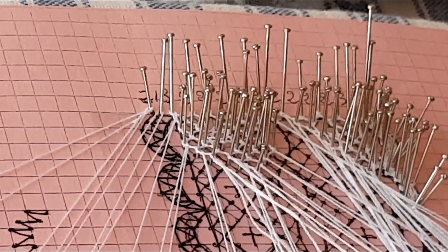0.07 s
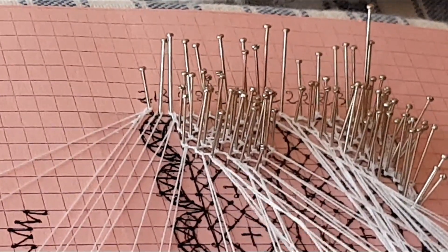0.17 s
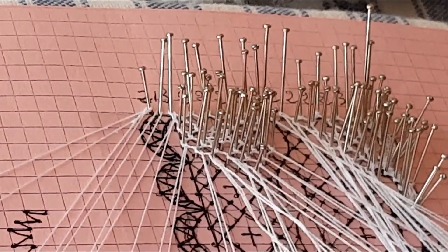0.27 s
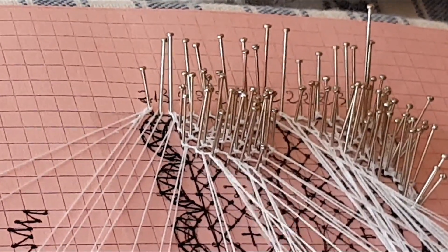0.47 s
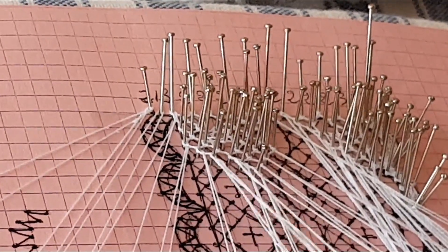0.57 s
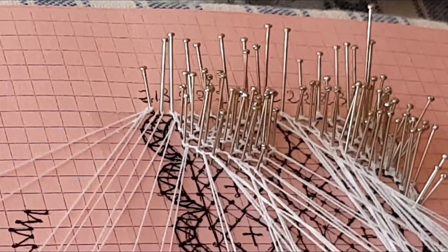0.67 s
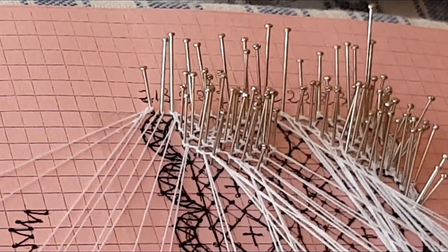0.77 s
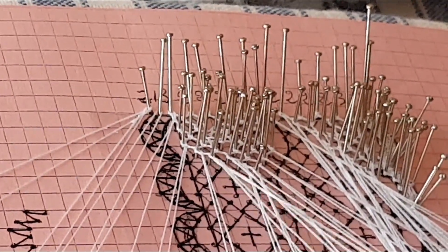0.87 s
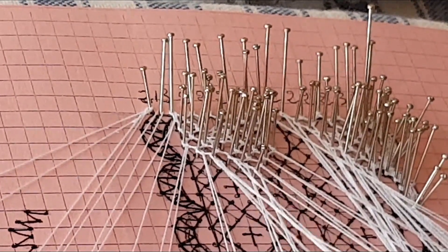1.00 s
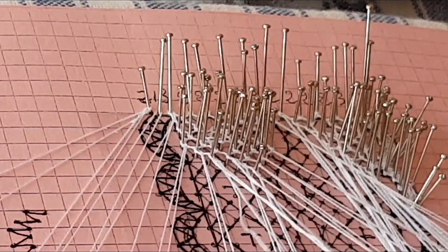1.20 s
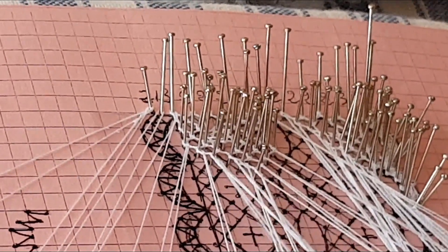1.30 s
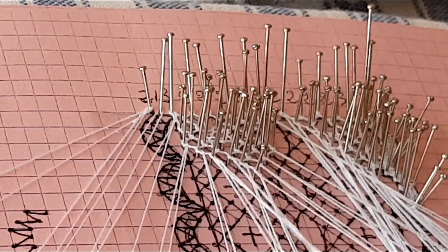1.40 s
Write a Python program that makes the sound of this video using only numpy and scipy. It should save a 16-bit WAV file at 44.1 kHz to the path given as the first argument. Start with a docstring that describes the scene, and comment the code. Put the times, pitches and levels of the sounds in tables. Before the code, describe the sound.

Bright, dry clicks of wooden bobbins being shuffled on a lace pillow, close to the microphone. A hand brushes softly midway, then a thread rubs and squeaks briefly among the last clicks, over a quiet room's faint hum.

```python
"""Lace bobbins on a pillow

Wooden bobbins are shuffled close by in a small quiet room, over a low hum and faint room noise.
Each knock is a dry contact tick plus three bending modes of both sticks; other ticks are noise bands.
A hand brushes the pillow; near the end a thread is drawn tight, rubbing and squeaking."""
import sys
import numpy as np
from scipy import signal
from scipy.fft import rfft, irfft
from scipy.io import wavfile
from scipy.ndimage import uniform_filter1d

SR = 44100
rng = np.random.default_rng(int(sys.argv[2]) if len(sys.argv) > 2 else 0)


def master_out(mix):
    """Clip the mix to full scale and print it as 16-bit PCM to the path in sys.argv[1]."""
    frames = np.transpose(np.atleast_2d(mix))
    ceiling = np.clip(frames, -1, 1)
    pcm = np.round(ceiling * 32767).astype(np.int16)
    wavfile.write(sys.argv[1], SR, pcm)


N = 63945
TIME = np.arange(N) / SR
TOUCH_TIME = TIME[:N // 12]
CONTACT_RISE_S = 0.00041

# bobbins sliding on the pillow: (time [s], level [dB])
SLIDE_LEVEL = [(.1, -77.5), (.31, -58), (.385, -47), (.59, -71), (.68, -58.5), (.77, -60), (.98, -67.5),
               (1.06, -50.5), (1.16, -69.5)]


def from_db(db):
    """Decibels to gain."""
    return 10 ** (np.asarray(db) / 20)


def level(rows):
    """Gain over time from (time [s], level [dB]) points."""
    return from_db(np.interp(TIME, *np.transpose(rows)))


def envelope(t, t60_s, rise_s=CONTACT_RISE_S):
    """Smooth onset, exponential decay."""
    return (1 - np.exp(-(t / rise_s) ** 2)) * from_db(-60 * t / t60_s)


def panned(db):
    """Stereo gains for a left-right level difference."""
    gains = from_db(np.array([[db], [-db]]) / 2)
    return gains / np.sqrt(np.mean(gains ** 2))


def noise(colour, correlation):
    """Coloured stereo noise, rms 1."""
    hz, db = np.transpose(colour)
    bin_hz = np.arange(N + 1) * SR / (2 * N)
    gain = from_db(np.interp(np.log(bin_hz + 1), np.log(hz), db))
    mid, side = irfft(rfft(rng.standard_normal((2, 2 * N))) * gain)[:, :N]
    x = np.sqrt(1 + correlation) * mid + np.sqrt(1 - correlation) * np.array([side, -side])
    return x / x.std()


def burst(source, t60_s):
    """A random stretch of noise, struck and dying away."""
    start = rng.integers(N - len(TOUCH_TIME))
    return source[:, start:start + len(TOUCH_TIME)] * envelope(TOUCH_TIME, t60_s)


def add(out, at_s, sound):
    """Mix a sound in at a given time."""
    i = int(np.clip(at_s * SR, 0, N - 1))
    out[:, i:i + sound.shape[1]] += sound[:, :N - i]


def background(hum_hz=61.5, air_db=-66.5):
    """Low swelling hum and steady room noise."""
    # hum: (time [s], level [dB])
    hum_level = [(0, -70.5), (.2, -58.5), (.42, -70.5), (.82, -65), (.95, -76.5)]
    # room noise: (frequency [Hz], relative density [dB])
    air_colour = [(20, -18.5), (70, 5.5), (170, -4), (400, -14.5), (1000, 3), (1500, -10.5), (4800, -46.5),
                  (7000, -24), (15000, -14)]
    hum = np.sqrt(2) * level(hum_level) * np.sin(2 * np.pi * hum_hz * TIME)
    return hum * panned(db=1.5) + from_db(air_db) * noise(air_colour, correlation=0.14)


def room(x, gain_db=-4.5):
    """Dense, short-lived reflections, different at each side."""
    t = TIME[:N // 2]
    tail = rng.standard_normal((2, len(t))) * envelope(t, t60_s=0.18, rise_s=0.0022)
    tail /= np.sqrt(np.sum(tail ** 2) / 2)
    return from_db(gain_db) * signal.fftconvolve(x.mean(axis=0)[None], tail, axes=1)[:, :N]


def hand():
    """A hand brushes the pillow: soft, low noise."""
    # brushing: (time [s], level [dB])
    brush_level = [(.62, -93.5), (.68, -61), (.79, -65.5), (.95, -74.5)]
    # brushing: (frequency [Hz], relative density [dB])
    brush_colour = [(150, -6.5), (700, -13), (2000, -16.5)]
    return level(brush_level) * noise(brush_colour, correlation=0.5)


def sliding(rough_db=4.0):
    """Grainy rustle of bobbins moving over the pillow."""
    # rustle: (frequency [Hz], relative density [dB])
    slide_colour = [(500, -19), (1600, 1), (2300, -6), (4900, 1), (6700, -17.5), (8800, 0), (10500, -10),
                    (16000, -16.5)]
    grain = uniform_filter1d(rng.standard_normal(N), size=100)
    grain = from_db(rough_db * grain / grain.std())
    grain /= np.sqrt(np.mean(grain ** 2))
    return level(SLIDE_LEVEL) * noise(slide_colour, correlation=0.15) * grain


def mode(hz, t60_s, lead_rad):
    """One decaying bending mode; the left side leads by about lead_rad."""
    phase = rng.uniform(0, 2 * np.pi) + np.array([[1], [-1]]) * (lead_rad + .5 * rng.standard_normal()) / 2
    return np.sin(2 * np.pi * hz * TOUCH_TIME + phase) * envelope(TOUCH_TIME, t60_s)


def stick(hz, first_db, second_db, third_db):
    """Three bending modes of a bobbin, the second at hz."""
    third_hz = 8985 * (hz / 5128) ** 0.68   # rises more slowly than the second
    return (from_db(first_db - 0.5) * mode(0.351 * hz, t60_s=0.11, lead_rad=1.46)
            + from_db(second_db + 0.5) * mode(hz, t60_s=0.028, lead_rad=1.0)
            + from_db(third_db + 3) * mode(third_hz, t60_s=0.019, lead_rad=1.26))


def rolling(taps_per_s=210, low_hz=3957, high_hz=5440):
    """Faint random taps of neighbouring bobbins, following the sliding level."""
    out = np.zeros((2, N))
    for when, pitch, strength in rng.random((int(taps_per_s * N / SR), 3)):
        tap = stick(low_hz + pitch * (high_hz - low_hz), first_db=-6.5, second_db=5, third_db=-2.5)
        add(out, when * N / SR, strength * tap)
    return out * level(SLIDE_LEVEL)


def thread():
    """A tightening thread rubs and breaks into short, unsteady gliding squeaks."""
    # rubbing: (time [s], level [dB])
    rub_level = [(1.19, -94), (1.24, -40), (1.29, -49.5), (1.345, -52), (1.45, -65.5)]
    # rubbing: (frequency [Hz], relative density [dB])
    rub_colour = [(1400, -40), (2900, -6.5), (4050, 4), (4600, 0.5), (6200, -21.5)]
    # squeaks: (time [s], length [s], start pitch [Hz], end pitch [Hz], level [dB])
    squeaks = [(1.280, 0.014, 2820, 3800, -46), (1.299, 0.0086, 4080, 4005, -35.5),
               (1.304, 0.021, 3810, 2710, -44), (1.33, 0.0186, 2895, 2605, -47)]
    out = level(rub_level) * noise(rub_colour, correlation=0.81)
    for at_s, length_s, start_hz, end_hz, db in squeaks:
        progress = np.linspace(0, 1, int(length_s * SR))
        waver = uniform_filter1d(rng.standard_normal(N), size=40)[:len(progress)]
        hz = start_hz * (end_hz / start_hz) ** progress * (1 + 0.26 * waver)
        squeak = np.sin(np.pi * progress) * np.sin(2 * np.pi * np.cumsum(hz) / SR)
        add(out, at_s, from_db(db) * squeak[None])
    return out * panned(db=13.5)


def dry_ticks(half_width_oct=0.18):
    """Short, dry bobbin ticks, each a narrow band of noise."""
    # ticks: (time [s], band centre [Hz], level [dB])
    ticks = [(0.3324, 5600, -39.5), (0.3683, 5560, -37), (.4298, 5094, -41.5), (0.6676, 5100, -42.5),
             (0.927, 3760, -46.5), (.9402, 9300, -47.5), (1.04, 4600, -32.5), (1.07, 4500, -39.5),
             (1.079, 4500, -35), (1.3893, 4020, -40.5), (1.4073, 3920, -36)]
    out = np.zeros((2, N))
    for at_s, hz, db in ticks:
        edges_hz = hz * 2 ** (half_width_oct * np.array([-1, 1]))
        white = rng.standard_normal((2, N)) + rng.standard_normal(N)
        band = signal.lfilter(*signal.butter(2, edges_hz, "band", fs=SR), white)
        add(out, at_s, from_db(db) * burst(band / band.std(), t60_s=0.021))
    return out


def bobbins():
    """Each knock: a contact tick, two ringing sticks and one quick rebound, slightly off pitch."""
    # knocks: (time [s], pitch [Hz], other stick's pitch [Hz], relative levels of modes 1, 2, 3 [dB],
    # of dull tick [dB], of bright tick [dB], left-right [dB])
    knocks = [ (0.1261, 4880, 5100, -60.5, -43.5, -44, -66, -62, 3),
              (0.1439, 4996, 4997, -51.5, -32.5, -33.5, -56, -47, 7),
              (0.2080, 5184, 4950, -43.5, -24.5, -15, -54, -31, -1),
              (0.2252, 5314, 4938, -30.5, -11.5, -3.5, -46, -16, -2.5),
              (0.3189, 4660, 4716, -52.5, -32, -64, -59, -69, 1),
              (0.3500, 5100, 5520, -55.5, -29, -31.5, -43.5, -38, -3),
              (0.3769, 4657, 4750, -45, -28, -33.5, -46, -52, 3.5),
              (0.3915, 4850, 4006, -61, -27, -41.5, -56, -40, -1),
              (0.4230, 5240, 4850, -69, -28.5, -33.5, -63, -39.5, -1),
              (0.4598, 5380, 5260, -66, -31.5, -40.5, -59, -44.5, 2.5),
              (0.4944, 4670, 4970, -86.5, -32.5, -46.5, -47, -51.5, -5.5),
              (0.5465, 5120, 5130, -68, -40.5, -69.5, -57.5, -70, 3.5),
              (0.6077, 5160, 5650, -85, -37.5, -47, -66, -62.5, -5),
              (0.6223, 5190, 4905, -75, -29.5, -47, -58, -66, -4),
              (0.6255, 5277, 5470, -85, -25, -37, -75, -53, -9),
              (0.6882, 4835, 4940, -83, -53, -41.5, -52, -57, 2),
              (0.7057, 4810, 5390, -82, -34.5, -27.5, -38, -39, -3.5),
              (0.7576, 4595, 5060, -48.5, -37, -44, -53, -59, 0.5),
              (0.785, 4087, 4607, -40, -41, -56, -51, -66, -1),
              (0.802, 4180, 5030, -58, -49, -39, -50, -37, 1),
              (0.8196, 4680, 3923, -47.5, -31.5, -26.5, -46, -26.5, -0.5),
              (0.9186, 4930, 5160, -50.5, -49, -55, -47.5, -42, -1.5),
              (1.0014, 4697, 3986, -53, -39, -50.5, -60, -54, 0.5),
              (1.0188, 4740, 4030, -42.5, -24.5, -37.5, -52, -47, 0),
              (1.0522, 5154, 4263, -39, -26.5, -38, -43, -40.5, -1.5),
              (1.0884, 4763, 5147, -47.5, -30, -61.5, -56, -51, -3),
              (1.2023, 5294, 5295, -61, -39, -38.5, -49.5, -52.5, 13),
              (1.2107, 5180, 5330, -66.5, -43, -29, -48.5, -63, 5),
              (1.2196, 5100, 5215, -49, -25, -21.5, -42, -30, -4.5),
              (1.2277, 5315, 4440, -49, -28.5, -22.5, -39, -38, 1),
              (1.239, 5047, 5353, -38.5, -24, -22, -42, -44, -1.5),
              (1.4375, 5340, 5100, -44.5, -32, -26.5, -45.5, -29.5, -2)]
    # dull contact noise: (frequency [Hz], relative density [dB])
    dull_colour = [(400, -39), (1500, -11.5), (3000, 6.5), (5800, 7.5), (7000, -5), (16000, -20.5)]
    # bright contact noise: (frequency [Hz], relative density [dB])
    bright_colour = [(3000, -30), (6900, -4), (8300, -3.5), (11500, 4), (14800, -10), (16000, -22.5)]
    # pillow thud: (frequency [Hz], relative density [dB])
    thud_colour = [(220, -3), (420, -27.5)]
    tick_t60_s, other_stick_db = 0.011, -5
    rebound_s, rebound_db, rebound_detune = 0.003, -8.5, 0.04
    thud_at_s, thud_db = 0.2254, -54.5   # only the hardest knock thuds
    out = np.zeros((2, N))
    dull, bright = noise(dull_colour, correlation=0.1), noise(bright_colour, correlation=0)
    add(out, thud_at_s, from_db(thud_db) * burst(noise(thud_colour, correlation=0.4), t60_s=0.096))
    for at_s, hz, other_hz, *modes_db, dull_db, bright_db, pan_db in knocks:
        pan = panned(pan_db)
        tick = from_db(dull_db + 10) * dull + from_db(bright_db + 1.5) * bright
        ring = stick(hz, *modes_db) + from_db(other_stick_db) * stick(other_hz, *modes_db)
        add(out, at_s, pan * (ring + burst(tick, tick_t60_s)))
        rebound_hz = (hz + other_hz) / 2 * (1 + rebound_detune * rng.standard_normal())
        rebound = stick(rebound_hz, *modes_db) + burst(tick, tick_t60_s)
        add(out, at_s + rebound_s * (.5 + rng.random()), pan * from_db(rebound_db) * rebound)
    return out


def scene():
    """Bobbins, thread and hand in the room, over the background."""
    quiet = background()
    work = bobbins() + dry_ticks() + thread() + sliding() + hand() + rolling()
    return work + room(work) + quiet


def record(dry):
    """Clip at full scale, then low-pass steeply."""
    lowpass = signal.cheby2(16, rs=75, Wn=16400, fs=SR, output="sos")
    return signal.sosfilt(lowpass, np.clip(dry, -1, 1))


dry = scene()
out = record(dry)
master_out(out)
```